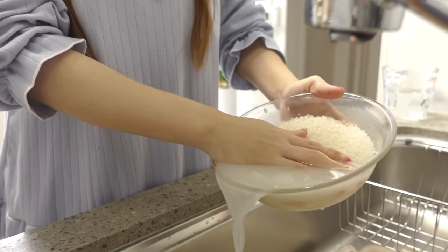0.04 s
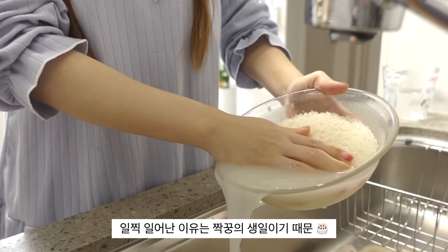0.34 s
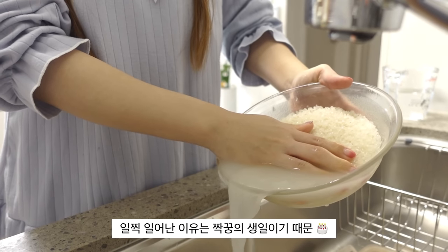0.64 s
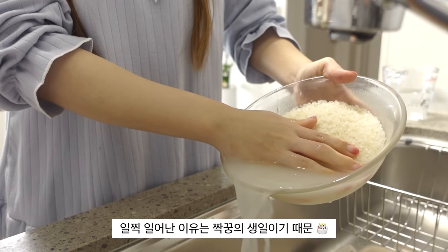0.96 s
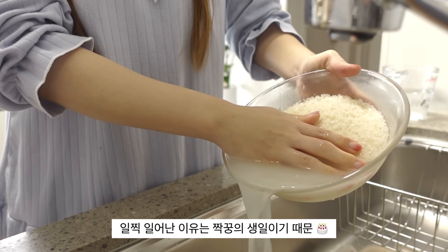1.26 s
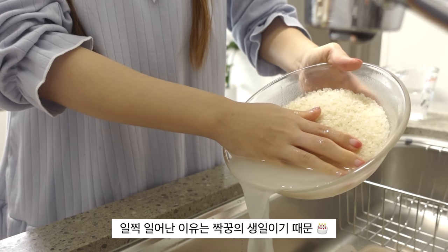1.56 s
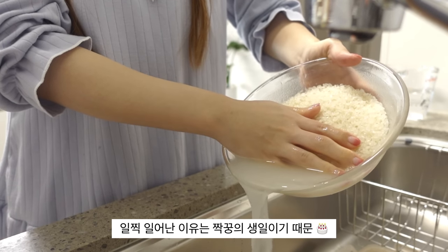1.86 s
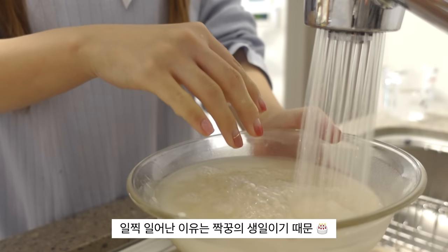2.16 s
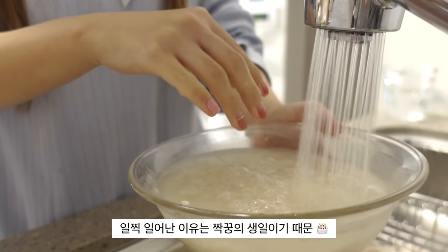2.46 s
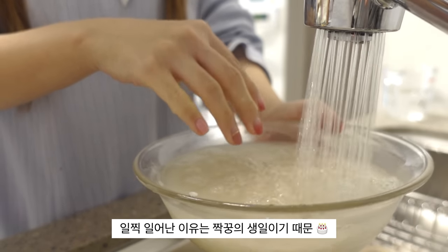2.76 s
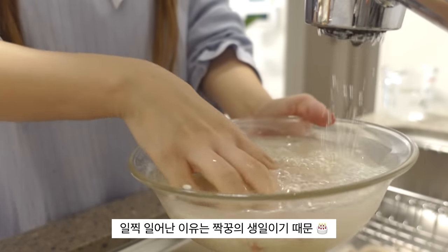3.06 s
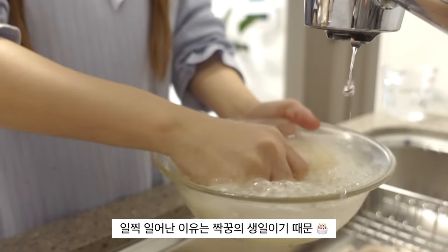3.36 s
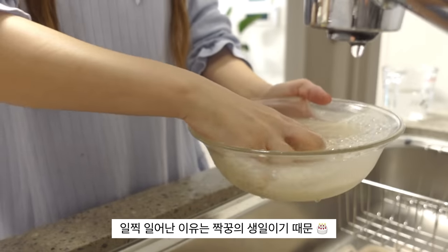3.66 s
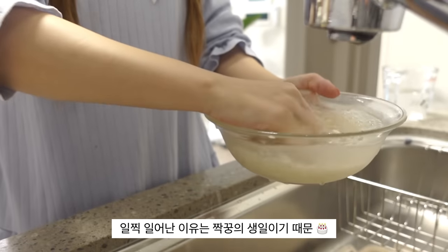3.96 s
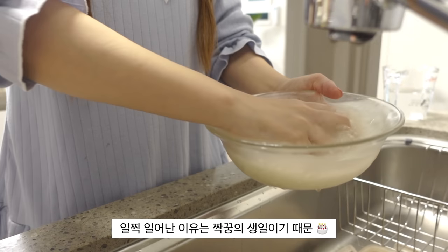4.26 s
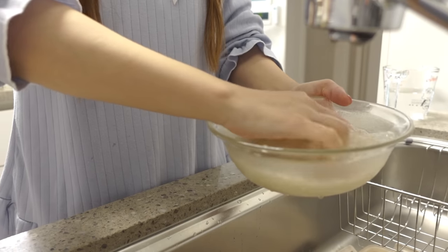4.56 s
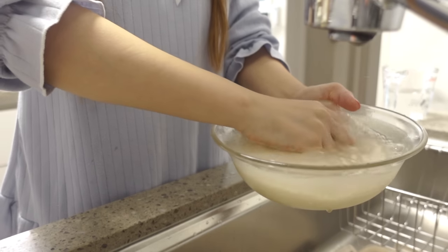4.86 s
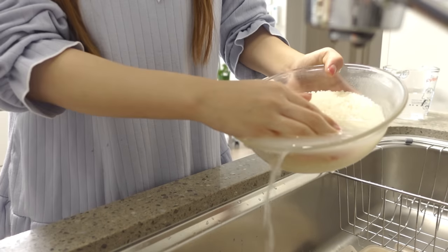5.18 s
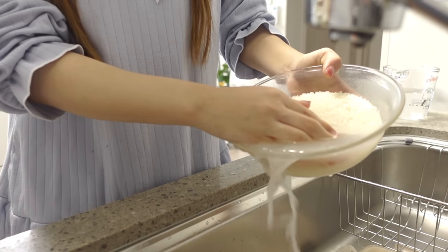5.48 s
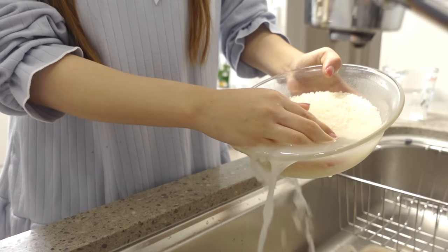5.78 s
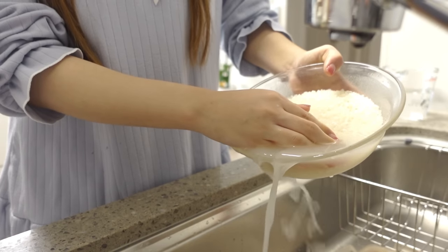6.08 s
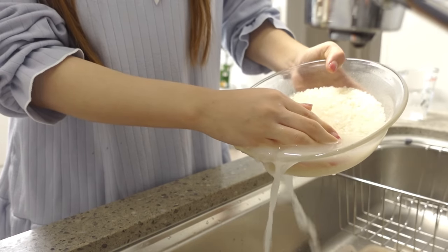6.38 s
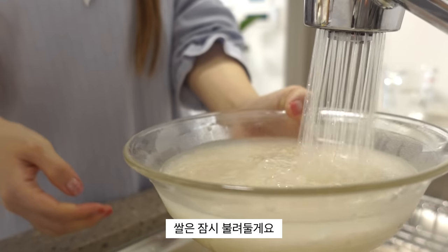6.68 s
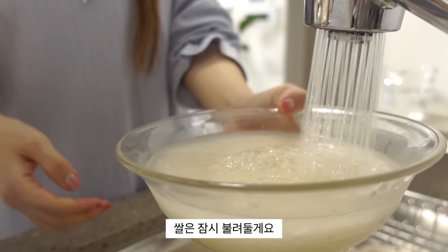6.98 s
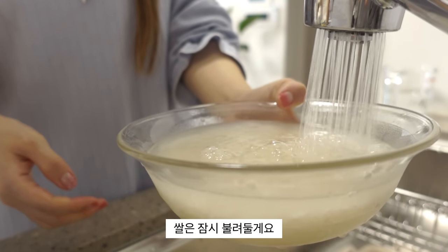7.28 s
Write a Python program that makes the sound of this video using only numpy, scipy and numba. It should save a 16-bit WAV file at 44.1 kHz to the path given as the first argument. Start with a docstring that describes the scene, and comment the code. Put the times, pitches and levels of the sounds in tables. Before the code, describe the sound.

Water is poured from a bowl into a steel kitchen sink, drumming and spattering with sharp drips. A tap sprays into the glass bowl and shuts off with a soft thump. A hand stirs wet rice in quick, gritty, squelching strokes. The water is poured off again, then the tap sprays once more. The sounds are close, over a faint appliance hum.

```python
"""Rice is washed in a glass bowl over a steel kitchen sink, while an appliance hums.
First cloudy water is poured off: it drums the basin's modes and spatters into ringing bubbles.
Near 2 s the tap sprays into the bowl, driving a bubble cloud that sinks in pitch, and is shut.
From 3 s to 5 s a hand stirs the wet rice: grains rub, and trapped air squelches, plops and gulps.
Then the water is poured off again, and from 6.5 s the tap refills the bowl."""
import sys
import numpy as np
from scipy import signal
from scipy.fft import rfft, irfft, next_fast_len
from scipy.io import wavfile
from scipy.ndimage import map_coordinates
from numba import njit

SR = 44100
rng = np.random.default_rng(int(sys.argv[2]) if len(sys.argv) > 2 else 0)


def dump(signal):
    """Clip the signal to [-1, 1] and save it as 16-bit WAV at the path in sys.argv[1]."""
    limited = np.clip(np.atleast_2d(signal).T, -1, 1)
    pcm = np.round(limited * 32767).astype(np.int16)
    wavfile.write(sys.argv[1], SR, pcm)


N = 332073
TIME = np.arange(N) / SR


def amp(db):
    """Amplitude ratio of a level in decibels."""
    return 10 ** (np.asarray(db) / 20)


def unit(x):
    """Normalisation to an rms of 1."""
    return x / np.sqrt(np.mean(x ** 2) + 1e-20)


def fade(t, t60):
    """Exponential decay, by 60 dB in t60 seconds."""
    return np.exp(-np.log(1000) * t / np.maximum(t60, 1e-4))


def along(points, hz):
    """Interpolation of (Hz, value) points on a logarithmic frequency axis."""
    f, v = np.transpose(points)
    return np.interp(np.log(hz + 1), np.log(f + 1), v)


def during(start, end):
    """A rectangular time window."""
    return (TIME >= start) & (TIME < end)


def wobble(rate):
    """Smooth random modulation with rate knots a second."""
    return map_coordinates(rng.standard_normal(int(N * rate / SR) + 4), [TIME * rate])


def filtered(x, response):
    """Linear filtering: the spectrum of x times a frequency response."""
    size = next_fast_len(N + SR // 2)
    return irfft(rfft(x, size) * response(np.fft.rfftfreq(size, 1 / SR)), size)[..., :N]


def coloured(x, spectrum):
    """Spectral shaping by (Hz, dB) points, to an rms of 1."""
    return unit(filtered(x, lambda hz: amp(along(spectrum, hz))))


def add(track, start, sound):
    """Superposition of a stereo sound on the track from start seconds."""
    part = track[:, max(round(start * SR), 0):][:, :sound.shape[1]]
    part += sound[:, :part.shape[1]]


def echoes(near_db, room_db, near_t60=0.05, side_db=-13, wall_db=-11):
    """Stereo impulse response: direct sound, early reflections from sink and wall, then reverberation."""
    # Each row: frequency in Hz, the kitchen's reverberation time in seconds.
    room_t60 = [(200, 0.07), (1000, 0.41), (4000, 0.16), (15000, 0.31)]
    t = np.arange(SR // 3) / SR
    near = rng.standard_normal((2, len(t))) * fade(t, near_t60) * (t > .0005)
    wall = rng.standard_normal((2, len(t))) * fade(np.abs(t - .014), 0.035)
    hz, frames, spectra = signal.stft(rng.standard_normal((2, len(t))), SR, nperseg=256)
    spectra *= fade(frames, along(room_t60, hz)[:, None])
    room = signal.istft(spectra, SR, nperseg=256)[1][:, :len(t)] * (t > .006)
    reflections = amp(near_db) * unit(near) + amp(wall_db) * unit(wall) + amp(room_db) * unit(room)
    mid, side = reflections / np.sqrt(len(t))
    mid[0] += 1  # direct sound
    return np.array([mid + amp(side_db) * side, mid - amp(side_db) * side])


def in_sink(x, near_db=0, room_db=-7, spots=4):
    """A distributed source: water lands on several spots in turn, each with its own reflections."""
    spot = np.repeat(rng.integers(spots, size=N // 128 + 1), 128)[:N]
    return sum(signal.oaconvolve((x * (spot == k))[None], echoes(near_db, room_db), axes=1)[:, :N]
               for k in range(spots))


@njit
def damped_sines(start, hz, life, size, glide, n, sr):
    """Free decay of many oscillators whose pitch rises as they die."""
    out = np.zeros(n)
    for k in range(len(start)):
        for i in range(min(int(5 * life[k] * sr), n - start[k])):
            age = i / sr / life[k]
            phase = 2 * np.pi * hz[k] * i / sr * (1 + glide * age)
            out[start[k] + i] += size[k] * np.exp(-age) * np.sin(phase)
    return out


def bubbles(rate, cycles, spread_db, glide=0.0088):
    """Bubble resonance in a spectrally flat swarm: small bubbles ring high and briefly."""
    when, smallness, persistence, strength = rng.random((int(rate * N / SR), 4)).T
    hz = 200 + 16500 * smallness ** 2
    size = (smallness * hz) ** .5 * amp(spread_db * np.minimum(-np.log(1 - strength), 4))
    life = cycles * (.5 + persistence) / hz  # seconds to fall to 1/e
    return unit(damped_sines((when * N).astype(np.int64), hz, life, size, glide, N, SR))


def impacts(rate, spread_db):
    """Shot noise: tiny random blows of uneven strength, on average rate a second."""
    blows = (rng.random(N) < rate / SR) * rng.choice([-1, 1], N)
    return unit(blows * amp(spread_db * np.minimum(rng.exponential(size=N), 2.5)))


def kitchen():
    """Ambient noise, and an appliance's hum with slight phase and amplitude modulation."""
    # Each row: frequency in Hz, relative level in dB.
    air_spectrum = [(15, -53), (25, -41.5), (49, -13), (87, -22), (115, -4), (150, -7.5), (185, 2.5),
                    (225, -8), (300, -13.5), (420, -19.5), (1200, -21), (3300, -29.5), (6000, -34),
                    (16000, -37.5)]
    air = coloured(rng.standard_normal(N) + amp(3.5) * rng.standard_normal((2, N)), air_spectrum)
    hum_hz = 178
    hum = np.sin(2 * np.pi * hum_hz * TIME + 0.43 * wobble(2.3)) * amp(-61.5 + 1.5 * wobble(7))
    return amp(-57.5) * air + hum


def gulps_and_room_ring():
    """Damped oscillation: low gulps and sloshes, and the kitchen's lingering ring after a loud plop."""
    # Each row: start in seconds, level in dB, pitch and width in Hz, swell and t60 in seconds.
    notes = [(2.923, -27.5, 130, 11, 0.034, 0.4), (2.976, -30, 379, 186, 0.011, 0.42),
             (3.564, -50, 209.8, 54, 0.025, 0.33), (4.051, -48, 350, 90, 0.021, 0.24),
             (4.05, -43, 980, 65, 0.02, 0.67), (4.06, -38.5, 2126, 90, .01, 0.45),
             (7.439, -40, 215, 19, 0.046, 0.48)]
    out, t = np.zeros((2, N)), np.arange(SR // 2) / SR
    for start, db, hz, width, swell, t60 in notes:
        knots = rng.standard_normal((2, int(width) + 4))
        waver, lumps = [map_coordinates(k, [t * width * 2]) for k in knots]  # wider sounds rougher
        tone = np.sin(2 * np.pi * hz * t + 1.5 * waver) * amp(min(width / 50, 3) * lumps)
        note = unit(signal.sosfilt(signal.butter(2, hz / 2, "high", fs=SR, output="sos"), tone))
        envelope = fade(np.maximum(t - swell, 0), t60) * np.minimum(t / swell, 1)
        add(out, start, amp(db) * np.array([note, note]) * envelope)
    return out


def stir_gains():
    """Incoherent sources add in power: strokes of the hand over bursting foam and settling grains."""
    # Each row: peak time, swell and release in seconds, relative grit and squelch levels in dB.
    strokes = [(3.24, 0.26, 0.22, -42, -40.5), (3.55, 0.09, 0.12, -41, -55), (3.76, 0.083, 0.1, -40, -63),
               (4.09, 0.13, 0.11, -43.5, -47), (4.31, 0.089, 0.048, -42.5, -57),
               (4.45, 0.11, 0.055, -47, -43.5), (4.63, 0.076, 0.07, -41, -50.5),
               (4.87, 0.12, 0.14, -44, -47)]
    foam_s, foam_db, fading_db_per_s, settling_db = 3.18, -38, 35, -53.5
    squelch = amp(foam_db - fading_db_per_s * np.maximum(TIME - foam_s, 0)) ** 2
    grit = amp(settling_db) ** 2
    for peak_s, swell, release, grit_db, squelch_db in strokes:
        push = np.exp(-((TIME - peak_s) / np.where(TIME < peak_s, swell, release)) ** 2)
        squelch = squelch + (amp(squelch_db) * push) ** 2
        grit = grit + (amp(grit_db) * push) ** 2
    return np.sqrt([squelch, grit]) * during(3.08, 5.012)  # the hand is in the bowl


def stirring():
    """Friction and bubble resonance: grains rub on grains and glass; water squelches between fingers."""
    # Each row of both: frequency in Hz, relative level in dB.
    squelch_spectrum = [(250, -28), (600, -15), (1000, -9.5), (1300, -12), (1600, -1.5), (1880, 2),
                        (3100, -2.5), (4500, -10), (9000, -21)]
    grit_spectrum = [(1500, -20), (3000, -2), (3900, -1), (6000, -4.5), (7800, -4), (10000, -11),
                     (16000, -18)]
    squelch, grit = stir_gains()
    froth = coloured(in_sink(bubbles(rate=1800, cycles=5, spread_db=2.5)), squelch_spectrum)
    rubbing = impacts(rate=860, spread_db=4.5) + amp(-8) * bubbles(rate=1500, cycles=18, spread_db=4.5)
    grains = coloured(in_sink(rubbing), grit_spectrum)
    pressure = amp(1.1 * wobble(25))
    return pressure * (amp(-6.5) * squelch * froth + amp(-1.1) * grit * grains)


def bursts(rows, level_db, snap_t60, spray_db, spray_t60, glide, splinter_db, near_db, room_db):
    """Impulsive excitation: a wet snap with a short spray, a rising bubble and three that split off."""
    out, t = np.zeros((2, N)), np.arange(SR // 12) / SR
    for start, db, hz, snap_db in rows:
        t60 = 36.8 / hz  # a fixed number of cycles

        def ring(f, age):
            """Damped oscillation of one bubble, gliding upward."""
            phase = 2 * np.pi * f * age * (1 + glide * (1 - fade(age, 7 * t60)))
            return np.sin(phase) * fade(age, t60) * (1 - np.exp(-2 * age * f))

        bubble = ring(hz, t)
        splinters = sum(ring(hz * np.exp(0.275 * rng.normal()), np.maximum(t - rng.uniform(0, .008), 0))
                        for _ in range(3))
        ringing = (bubble + amp(splinter_db) * splinters) / np.abs(bubble).max()
        edges_hz = [min(.65 * hz, 8000), min(7 * hz, 20000)]  # larger bubbles snap lower
        noise = rng.standard_normal(len(t)) * (fade(t, snap_t60) + amp(spray_db) * fade(t, spray_t60))
        snap = signal.sosfilt(signal.butter(3, edges_hz, "band", fs=SR, output="sos"), noise)
        burst = amp(db + level_db) * (ringing + amp(snap_db) * snap / np.abs(snap).max())
        add(out, start, signal.fftconvolve(burst[None], echoes(near_db, room_db), axes=1))
    return out


def plopping():
    """Air pockets burst and resonate in the puddle or between fingers and rice."""
    # Each row: start in seconds, relative level in dB, bubble pitch in Hz, snap over bubble in dB.
    plops = [(0.975, -14.5, 2360, -5), (1.138, -24, 2390, -12), (1.159, -21.5, 1666, -2),
             (1.362, -21.5, 2400, -20), (1.609, -29, 1180, -16), (1.658, -21, 1760, -8),
             (1.824, -20, 1850, 11.5), (2.985, -23, 1030, 7), (2.987, -16.5, 1920, -15),
             (3.16, -20.5, 3560, 12), (3.211, -21.5, 3160, 5.5), (3.579, -38, 6950, 15),
             (3.702, -39.5, 1900, 13), (3.722, -28, 2420, 11), (3.736, -13.5, 4030, -0.5),
             (3.815, -31, 1660, -27), (4.052, -25, 957, -12), (4.057, -20.5, 3090, -6),
             (4.062, -14.5, 2094, -8), (4.246, -28, 2100, -26), (4.257, -27, 1206, 7.5),
             (4.258, -23.5, 4700, 10.5), (4.658, -26, 7560, 3), (4.821, -32.5, 880, 10),
             (5.433, -40.5, 1750, 12)]
    return bursts(plops, level_db=-4, snap_t60=0.016, spray_db=-6.5, spray_t60=0.036,
                  glide=0.027, splinter_db=-11.5, near_db=2, room_db=-7)


def dripping():
    """Impact and air entrainment: the loudest drops snap in the sink and leave ringing bubbles."""
    # Each row: start in seconds, relative level in dB, bubble pitch in Hz, snap over bubble in dB.
    drops = [(0.18, -20.5, 11700, 4), (0.2206, -19, 6900, -4), (0.2883, -16, 3970, 0.5),
             (0.381, -11.5, 8500, 1), (0.5003, -10, 13000, -2), (0.565, -4.5, 7400, -9),
             (0.6008, -8, 3880, -3), (0.644, -14.5, 3930, -14), (0.671, -11.5, 3850, -8),
             (0.746, -4, 6310, 0.5), (0.8979, -4.5, 5100, -2), (0.95, -11.5, 8870, 1.5),
             (0.98, -13.5, 4500, 7), (1.04, -2.5, 13300, -8), (1.08, -8, 8340, -4), (1.097, -3, 7900, -5),
             (1.2018, -5, 6360, -5), (1.214, -14, 3900, 1.5), (1.3272, -7, 6050, 1),
             (1.3568, -10, 6990, 1.5), (1.454, -8.5, 8160, 1), (1.6224, -11, 5500, 7),
             (1.6507, -10, 3460, -8), (1.7293, -8.5, 5900, -1), (1.789, -15, 4330, 1.5),
             (1.8405, -10, 3100, 5.5), (5.5087, -19, 11100, 0), (5.5482, -10, 5740, -2),
             (5.717, -12.5, 8260, 1), (5.7785, -16, 9600, 3), (5.8631, -12, 6130, 10),
             (5.9257, -14, 8700, -6), (6.0023, -14, 6200, 4), (6.0634, -9.5, 6170, -11),
             (6.1894, -10, 7400, 1), (6.342, -21, 4160, 13), (6.377, -7, 13100, -10),
             (6.4105, -15.5, 6230, -6), (6.4367, -3, 12900, -2.5)]
    return bursts(drops, level_db=-6, snap_t60=0.005, spray_db=2.5, spray_t60=0.029,
                  glide=0.024, splinter_db=-5.5, near_db=0, room_db=-7.5)


def fill_controls():
    """Rising water lowers the cloud's resonance and cushions the fizz; shutting the tap brings decay."""
    # Each row: start and end in seconds, relative bubbling and fizz in dB, first and final cloud Hz.
    fills = [(1.908, 3.127, -23.5, -20, 830, 620), (6.487, 7.54, -23.5, -20.5, 898, 592)]
    settle_s, shut_s = 0.34, 2.938
    cushioning, bubbling_decay, fizz_decay = 4, 147, 195  # dB per second
    bubbling, fizz, cloud_hz = np.zeros(N), np.zeros(N), np.full(N, 600.)
    for start, end, bubbling_db, fizz_db, first_hz, final_hz in fills:
        on = during(start, end)
        age = TIME[on] - start
        since_shut = np.maximum(TIME[on] - shut_s, 0) * (start < shut_s)
        bubbling[on] = amp(bubbling_db - bubbling_decay * since_shut)
        fizz[on] = amp(fizz_db - cushioning * age - fizz_decay * since_shut)
        cloud_hz[on] = final_hz + (first_hz - final_hz) * np.exp(-age / settle_s)
    return bubbling, fizz, cloud_hz


def spraying():
    """Collective oscillation: thin jets beat a bubble cloud into the bowl, and it resonates as a whole."""
    # Peaks and dips of the half-filled bowl. Each row: centre in Hz, width in Hz, gain in dB.
    bowl_bands = [(1203, 110, -1), (1460, 230, -5.5), (1830, 260, 2.5), (2100, 190, -7), (2220, 88, 2.5),
                  (2750, 130, 3), (3040, 150, 2.5), (3470, 640, -1.5), (3970, 200, 5.5), (4320, 284, -7.5),
                  (4740, 1100, 1), (6950, 420, -17)]
    # Each row of both: frequency in Hz, relative level in dB.
    bubbling_spectrum = [(30, -48), (70, -39.5), (125, -11), (200, -16), (350, -18.5), (600, -6.5),
                         (1100, -3), (2500, 0), (4000, -2.5), (5700, 1), (8000, -2), (12000, -22.5),
                         (16000, -32)]
    fizz_spectrum = [(2000, -45), (5000, -5.5), (8000, 0), (10000, 0), (13000, -1), (16000, -4.5)]
    bubbling, fizz, cloud_hz = fill_controls()
    jets = bubbles(rate=6000, cycles=7.1, spread_db=3.5) + amp(0.5) * impacts(rate=4000, spread_db=4.5)
    bowl = lambda f: amp(sum(db / (1 + (2 * (f - hz) / width) ** 4) for hz, width, db in bowl_bands))
    swarm = filtered(in_sink(jets, near_db=-3.5, room_db=-5), bowl)
    hz, frames, spectra = signal.stft(coloured(swarm, bubbling_spectrum), SR, nperseg=1024)
    octaves = np.log2((hz[:, None] + 1) / np.interp(frames, TIME, cloud_hz))
    # a peak at the cloud's pitch and a dip just below it
    cloud_db = 6.9 * np.exp(-(octaves / 0.37) ** 2) - 6 * np.exp(-((octaves + 0.57) / 0.18) ** 2)
    water = unit(signal.istft(spectra * amp(cloud_db), SR, nperseg=1024)[1][:, :N])
    mist = bubbles(rate=5000, cycles=2.7, spread_db=3.5) + amp(-1.5) * impacts(rate=5000, spread_db=4.5)
    mist = coloured(in_sink(mist, near_db=-3.5, room_db=-17.5), fizz_spectrum)
    return amp(0.79 * wobble(25)) * (amp(2.5) * bubbling * water + amp(0.5) * fizz * mist)


def pour_gains():
    """Drumming, thudding, splash and spatter follow the flow; jet breakup soon raises the spatter."""
    # Flow over the tipped bowl's rim. Each row of both: time in seconds, relative flow in dB.
    first_flow = [(0.158, -8.5), (0.2, -4), (0.26, -4), (0.365, -8), (0.4, 1.5), (0.53, -2.5), (1.02, 3),
                  (1.42, -3), (1.911, -0.5)]
    second_flow = [(5.297, -21.5), (5.42, -8), (5.59, -6), (5.68, 1.5), (5.87, -1.5), (6.0, 1.5), (6.1, -3),
                   (6.23, 0), (6.29, -4.5), (6.35, -1), (6.486, -1.5)]
    # Each row: relative drumming, thudding and splash in dB, splash drift in dB per second as the
    # puddle deepens, relative spatter in dB, time until the stream breaks up in seconds.
    pours = [(-42.5, -65, -50.5, 8.5, -29, 0.18), (-35.5, -44, -40, -1.5, -33.5, 0.42)]
    gains, smooth_stream_db = np.zeros((4, N)), -8
    for curve, pour in zip([first_flow, second_flow], pours):
        drum_db, thud_db, splash_db, drift, spatter_db, breakup_s = pour
        times, flow_db = np.transpose(curve)
        age = np.clip(TIME, times[0], times[-1]) - times[0]
        smooth = np.maximum(1 - (age / breakup_s) ** 4, 0)
        flow = during(times[0], times[-1]) * amp(np.interp(TIME, times, flow_db))
        levels = drum_db, thud_db, splash_db + drift * age, spatter_db + smooth_stream_db * smooth
        gains += [flow * amp(db) for db in levels]
    return gains


def steel_basin(f):
    """Modal superposition: the basin's response at f Hz, rolled off below 50 Hz."""
    # Each row: mode frequency in Hz, bandwidth in Hz, relative level in dB.
    modes = [(81.2, 33, -17), (130, 14, -12.5), (215, 11, 5.5), (290, 90, -12), (352, 19, -2.5),
             (447.5, 23, -5.5), (565.5, 16, -9.5), (790, 63, -12), (1094, 11, -9)]
    response = sum((-1) ** k * amp(db) * 1j * f * width / (hz * hz - f * f + 1j * f * width)
                   for k, (hz, width, db) in enumerate(modes))
    return response * f ** 2 / (f ** 2 + 50 ** 2)


def pouring():
    """Forced vibration and air entrainment: the stream drums the steel, splashes and throws droplets."""
    # Each row of all three: frequency in Hz, relative level in dB.
    splash_spectrum = [(40, -16), (120, -3), (400, -8.5), (800, 1), (1350, 1), (1800, 3), (2600, 0),
                       (4500, -13), (10000, -38)]
    spatter_spectrum = [(800, -34.5), (2200, -6.5), (3900, -0.5), (6000, 0.5), (8500, 0), (11000, -2.5),
                        (16000, -3)]
    thud_spectrum = [(30, -29.5), (80, -0.5), (130, 3), (200, -11.5), (300, -15.5), (430, 1.5), (600, -1.5),
                     (1000, -4), (1500, -21), (3000, -44.5)]
    drum, thud, splash, spatter = pour_gains()
    basin = unit(filtered(impacts(rate=500, spread_db=1.5), steel_basin))
    puddle = bubbles(rate=2000, cycles=2.6, spread_db=4.5) + amp(-9) * impacts(rate=990, spread_db=8.5)
    puddle = coloured(in_sink(puddle), splash_spectrum)
    spray = bubbles(rate=1100, cycles=3.5, spread_db=4.5) + amp(-3) * impacts(rate=1200, spread_db=4.5)
    spray = coloured(in_sink(spray), spatter_spectrum)
    patter = impacts(rate=60, spread_db=2.5) + bubbles(rate=110, cycles=8, spread_db=2.5)
    patter = coloured(in_sink(patter, near_db=-1), spatter_spectrum)
    gurgle = coloured(in_sink(bubbles(rate=260, cycles=7, spread_db=2.5, glide=.02)), splash_spectrum)
    slaps = coloured(impacts(rate=350, spread_db=1.0), thud_spectrum)
    lumps, slops = amp(1.1 * wobble(45)), amp(1.8 * wobble(25))  # the stream breaks up unevenly
    water = slops * (amp(-2) * puddle + amp(-6) * gurgle)
    droplets = amp(-2.5) * spray + amp(-3.5) * patter
    return lumps * (drum * basin + thud * slaps + splash * water + spatter * droplets)


def scene():
    """Superposition of all the sources at the sink."""
    return dripping() + plopping() + pouring() + spraying() + stirring() + gulps_and_room_ring() + kitchen()


def record(dry):
    """Mid-side stereo: a narrow microphone with slightly unequal sides and a band limit."""
    # Each row: frequency in Hz, gain of the side signal in dB.
    width = [(100, -12), (500, 2), (1000, -1), (2000, -8), (8000, -6), (13000, -11)]
    # Each row: frequency in Hz, left minus right in dB.
    balance = [(60, 1.5), (110, 0.5), (200, 1.5), (380, 2), (700, -1), (1290, -1), (2380, 0.5), (4400, -1),
               (8120, -1.5), (15000, -0.5)]
    top_hz = 15950
    mid = (dry[0] + dry[1]) / 2
    side = filtered((dry[0] - dry[1]) / 2, lambda hz: amp(along(width, hz)))
    imbalance = lambda hz: amp(np.outer([1, -1], along(balance, hz)) / 2)
    band_limit = lambda hz: 1 / (1 + (hz / top_hz) ** 200)
    return filtered(np.array([mid + side, mid - side]), lambda hz: imbalance(hz) * band_limit(hz))


dry = scene()
out = record(dry)
dump(out)
```